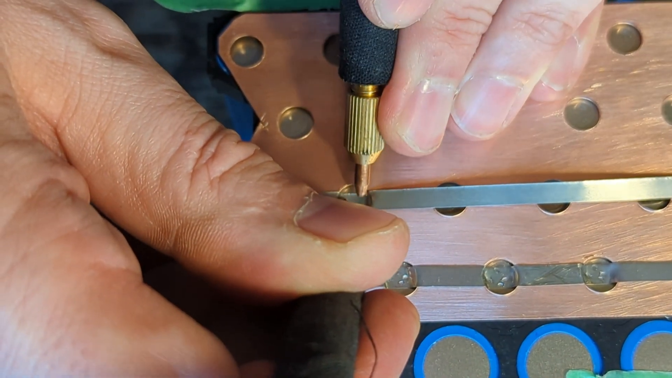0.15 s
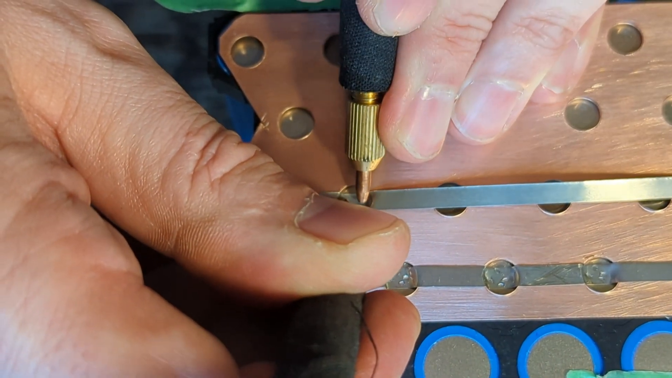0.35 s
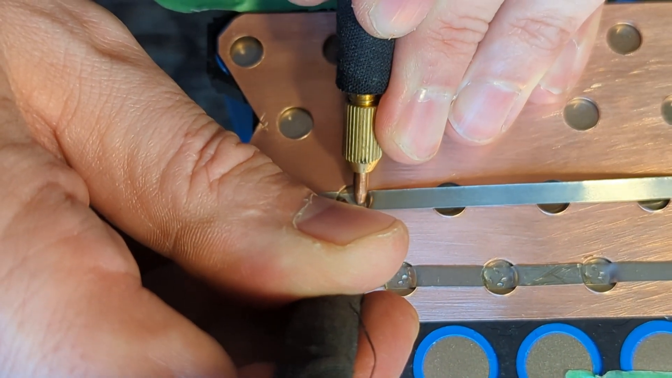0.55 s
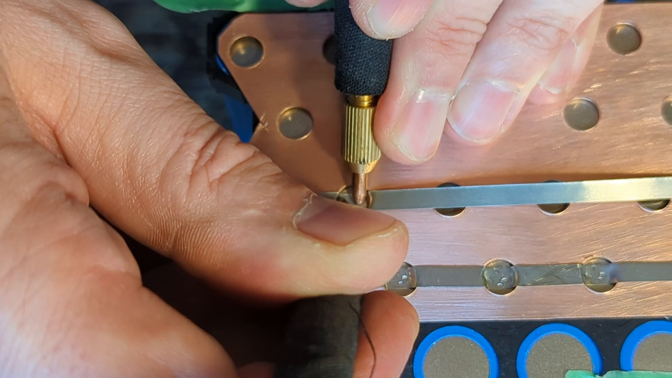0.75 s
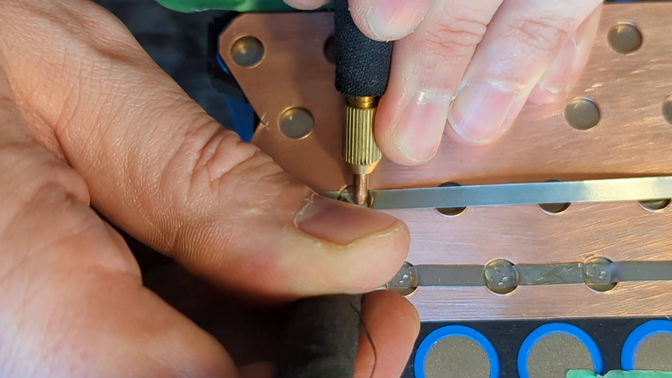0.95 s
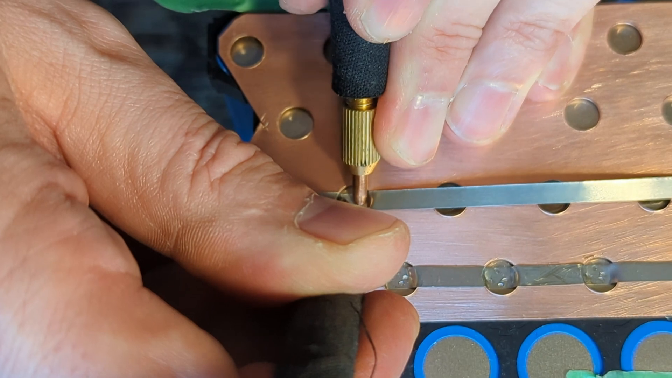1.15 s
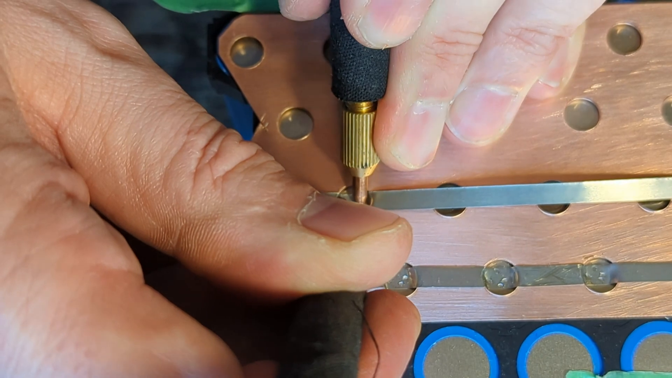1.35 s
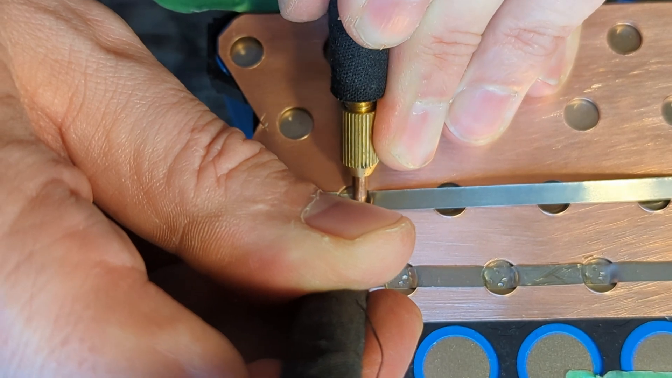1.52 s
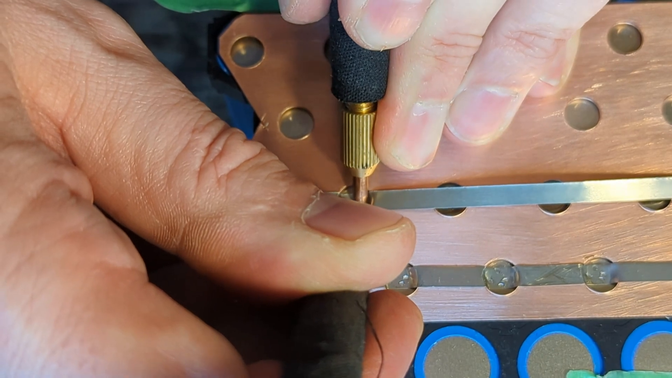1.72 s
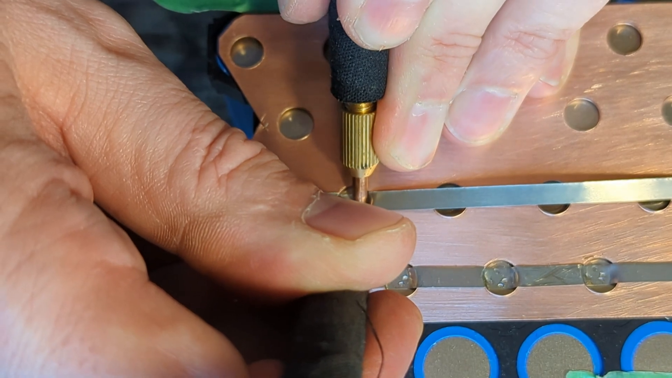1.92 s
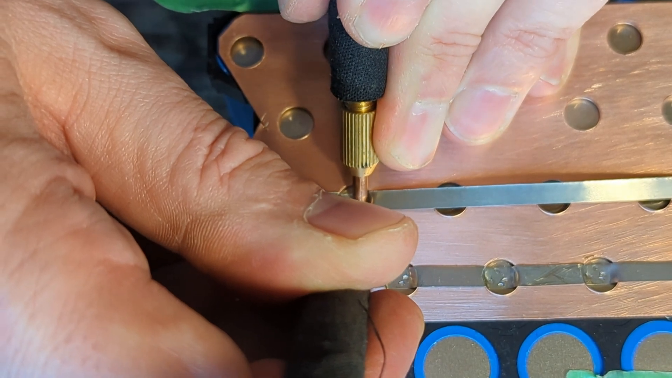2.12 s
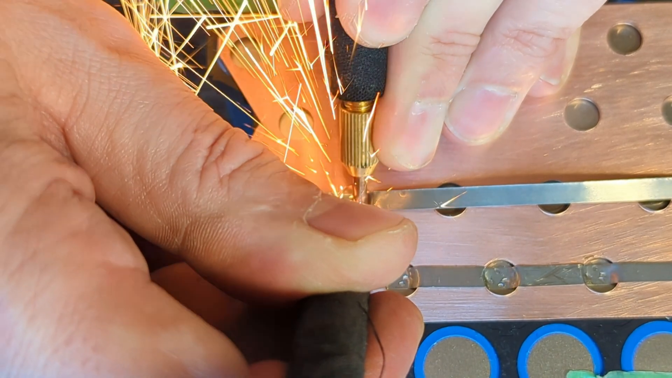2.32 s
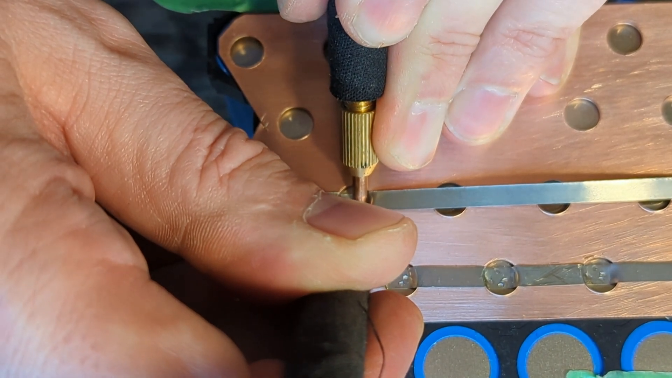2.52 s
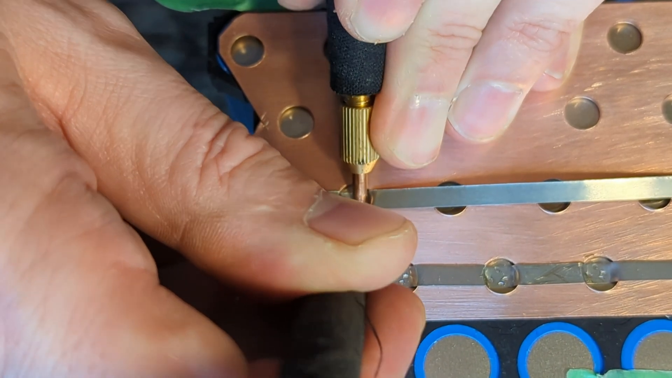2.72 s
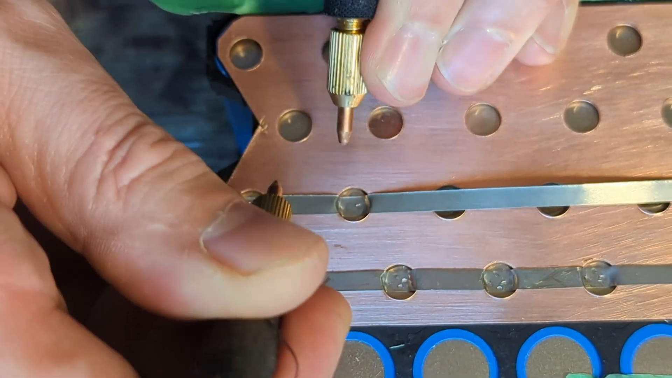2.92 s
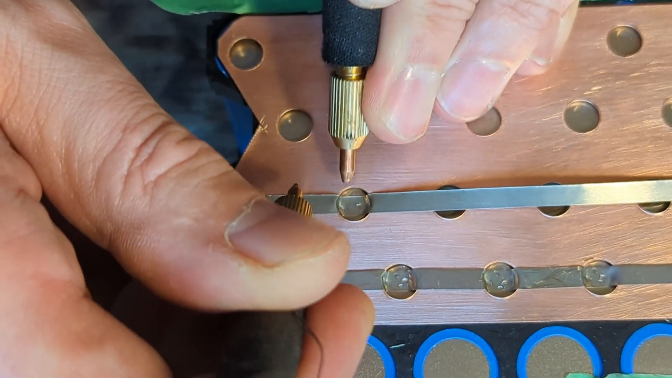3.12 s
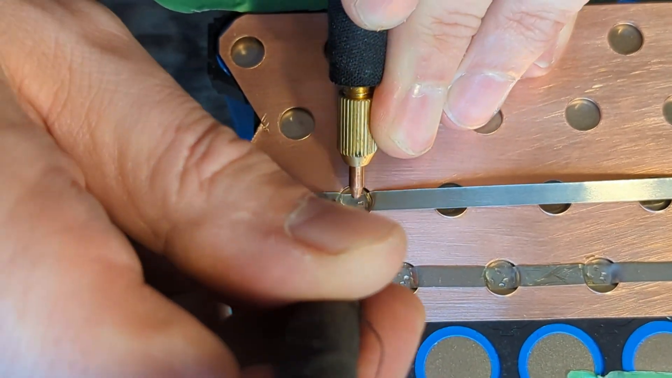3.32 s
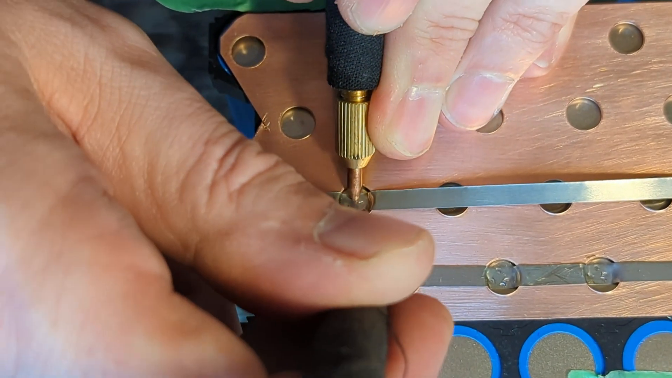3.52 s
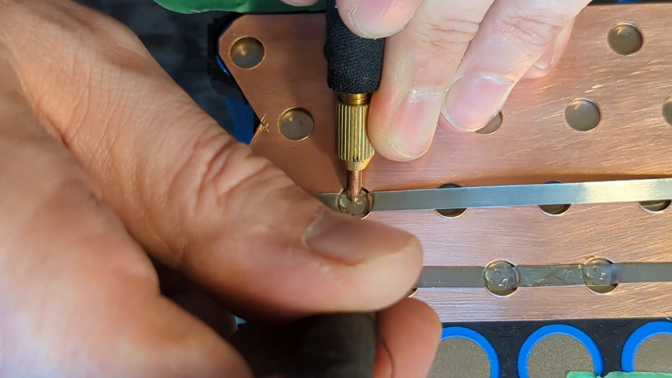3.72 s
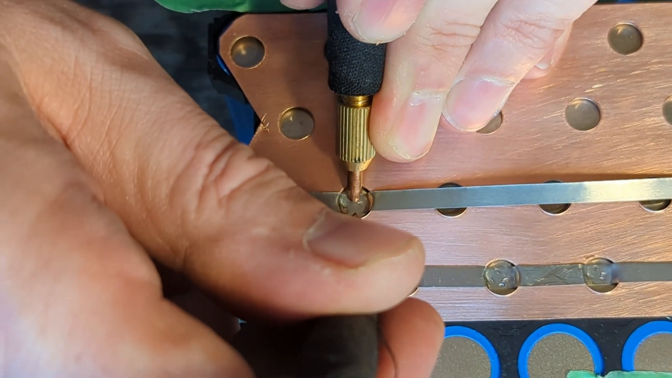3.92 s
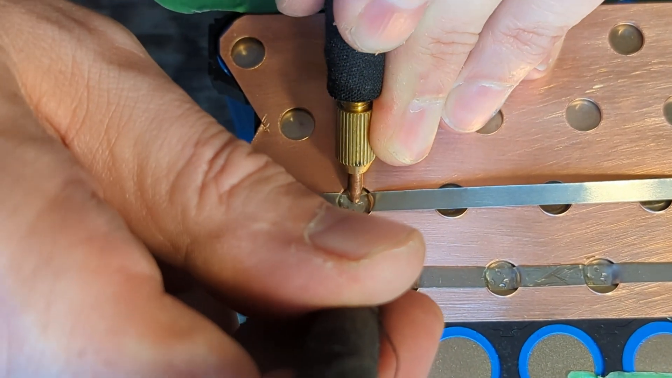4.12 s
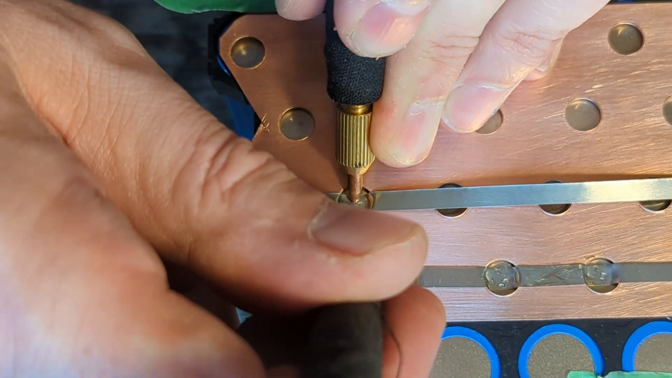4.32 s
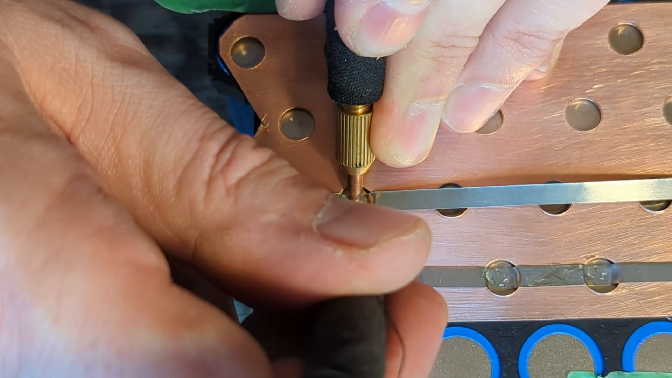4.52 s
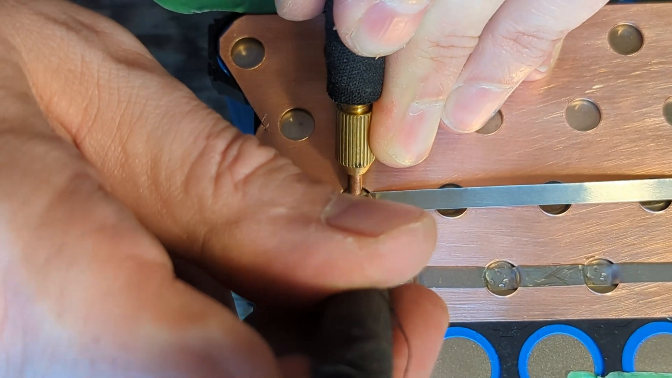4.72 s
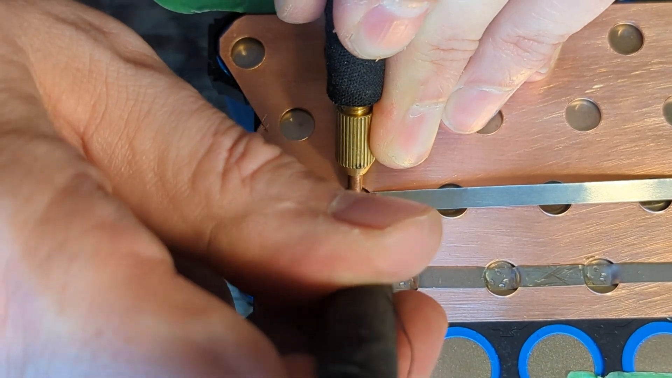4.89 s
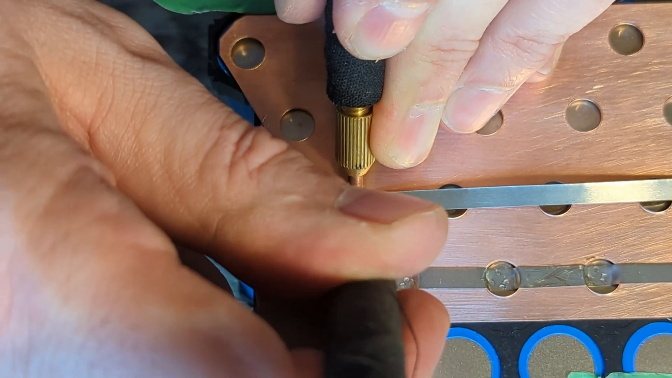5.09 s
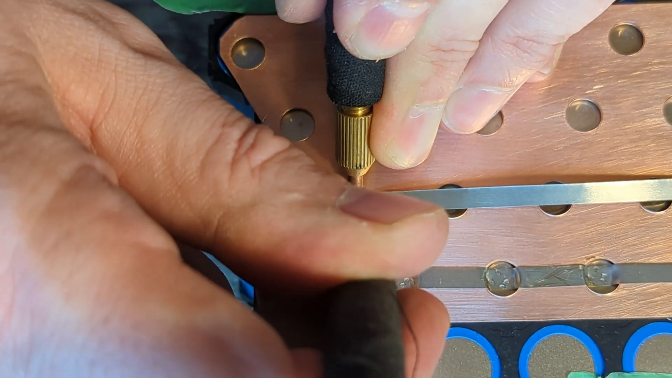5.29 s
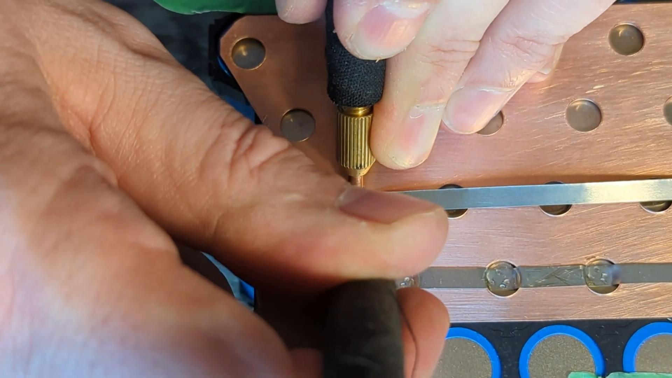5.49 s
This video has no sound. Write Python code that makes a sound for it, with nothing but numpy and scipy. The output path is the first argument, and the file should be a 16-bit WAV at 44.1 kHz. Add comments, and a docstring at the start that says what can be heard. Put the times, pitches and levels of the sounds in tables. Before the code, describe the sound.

A fan hums faintly in a small workshop. After a little over two seconds, a handheld spot welder fires once through a metal strip on a battery pack, a sharp snap with a spit of sparks and a brief ring of copper plate. Half a second later the probes come unstuck with light ticks and a dull, close thump. Cables rub softly, and a few faint ticks follow as the tips are set down again.

```python
"""A handheld spot welder fires once through a metal strip on a copper battery plate: a sharp snap.
The current pulse excites the resonances of strip and plate, and molten metal spits sparks.
The probes come unstuck with light ticks and a dull, close thump, the damped low modes of the pack,
as hands and cables shift with friction noise; then the tips are set on the next spot.
A fan hums behind it all, and the small workshop adds a short reverberation to the impacts."""
import sys
import numpy as np
from scipy import signal
from scipy.fft import rfft, irfft, next_fast_len
from scipy.io import wavfile
from scipy.ndimage import uniform_filter1d, map_coordinates

SR = 44100
rng = np.random.default_rng(int(sys.argv[2]) if len(sys.argv) > 2 else 0)


def persist_wave(psi):
    """Save psi, clipped to +-1, as 16-bit WAV."""
    counts = np.round(np.clip(psi, -1, 1) * 32767).astype(np.int16)
    wavfile.write(sys.argv[1], SR, np.atleast_2d(counts).T)


N = 244755
T = np.arange(N) / SR
RIGHT_LAG_S = .00011  # sound reaches the left microphone first
LEAD_S = .015  # time allowed for a burst to build up


def amp(db):
    """Amplitude ratio of a level in decibels."""
    return 10 ** (np.asarray(db) / 20)


def unit(x):
    """Normalisation to rms 1."""
    return x / np.sqrt(np.mean(x ** 2) + 1e-20)


def along(points, hz):
    """Interpolation of (f/Hz, value) points on a logarithmic frequency axis."""
    f, values = np.transpose(points)
    return np.interp(np.log(hz + 1), np.log(f + 1), values)


def peaks(resonances, hz):
    """Resonance: Lorentzian peaks in dB from rows of f/Hz, width/Hz, gain/dB."""
    return sum(db / (1 + (2 * (hz - centre) / width) ** 2) for centre, width, db in resonances)


def wobble(rate):
    """Slow random modulation: a spline through `rate` Gaussian values a second."""
    return map_coordinates(rng.standard_normal(int(N * rate / SR) + 4), [T * rate])


def fade(t, t60):
    """Exponential decay by 60 dB in t60."""
    return np.exp(-np.log(1000) * t / t60)


def stroke(start, length, attack, t60):
    """Envelope of a movement: Gaussian rise up to `start`, a plateau, then exponential decay."""
    return np.exp(-(np.minimum(T - start, 0) / attack) ** 2) * fade(np.maximum(T - start - length, 0), t60)


def softened(hz, contact_s):
    """An impact acts as a low-pass: the longer the contact, the weaker the high modes."""
    return 1 / (1 + (hz * contact_s) ** 4)


def add(track, start, sound):
    """Superposition of a sound on a track from `start` seconds on."""
    part = track[..., round(start * SR):][..., :sound.shape[-1]]
    part += sound[..., :part.shape[-1]]


def filtered(x, response):
    """Linear filtering: the spectrum is multiplied by a frequency response."""
    size = next_fast_len(N + SR // 2)
    return irfft(rfft(x, size) * response(np.fft.rfftfreq(size, 1 / SR)), size)[..., :N]


def causal(x, colour_db):
    """Minimum-phase filtering: a body rings only after it is struck."""
    size = x.shape[-1]
    cepstrum = irfft(np.log(amp(colour_db(np.fft.rfftfreq(size, 1 / SR)))))
    cepstrum[..., 1:size // 2] *= 2
    cepstrum[..., size // 2 + 1:] = 0
    return irfft(rfft(x) * np.exp(rfft(cepstrum)))


def burst(colour_db, t60, spread, swell=.001, size=8192):
    """Source and filter: a noise pulse, near rms 1 at LEAD_S, is coloured; spread is side over mid."""
    t = np.arange(size) / SR - LEAD_S
    envelope = fade(np.maximum(t, 0), t60) * fade(np.maximum(-t, 0), swell)
    noise = rng.standard_normal((2, size)) * envelope
    # flatten the excitation, so that the struck body sets the colour
    lumps_db = 10 * np.log10(np.abs(uniform_filter1d(np.abs(rfft(noise)) ** 2, size=24)))
    mid, side = causal(noise, lambda hz: colour_db(hz) - lumps_db)
    pair = np.array([mid + spread * side, np.roll(mid - spread * side, round(RIGHT_LAG_S * SR))])
    return unit(pair) * np.sqrt(np.mean(envelope ** 2))


# likeness of steady noise at the two microphones: f/Hz, correlation
CORRELATION = [(60, 1), (200, 0.81), (500, .35), (700, .15), (900, -.25), (1120, -0.047), (1400, -0.74),
               (2000, 0.35), (4000, 0.073), (9000, -0.034)]
def rush(colour_db):
    """Partial coherence: steady stereo noise of rms 1, delayed on the right."""
    angle = lambda hz: np.arccos(np.clip(along(CORRELATION, hz), -1, 1)) / 2
    response = lambda hz: amp(colour_db(hz)) * [np.cos(angle(hz)), np.sin(angle(hz))]
    mid, side = filtered(rng.standard_normal((2, N)), response)
    right = filtered(mid - side, lambda hz: np.exp(-2j * np.pi * hz * RIGHT_LAG_S))
    return unit(np.array([mid + side, right]))


def patchy(x, depth_db):
    """Turbulence: patches of noise swell and fade, each band on its own."""
    spectrogram = signal.stft(x, nperseg=1024)[2]
    field = uniform_filter1d(rng.standard_normal(spectrogram.shape[1:]), 4, axis=0)
    field = uniform_filter1d(field, 6, axis=1)
    return unit(signal.istft(spectrogram * amp(depth_db * unit(field)), nperseg=1024)[1][:, :N])


# reverberation time of the workshop: f/Hz, T60/s
REVERBERATION = [(100, .4), (700, 0.39), (2000, 0.24), (7000, 0.25), (15000, 0.23)]
def workshop(x, near_db, room_db, near_t60=.014, gap_s=.003):
    """Reverberation: early reflections off bench and hands and a diffuse tail follow the direct sound."""
    hz, t, noise = signal.stft(rng.standard_normal((2, SR // 2)), SR, nperseg=256)
    tail = signal.istft(noise * fade(t, along(REVERBERATION, hz)[:, None]), SR, nperseg=256)[1]
    near = rng.standard_normal(tail.shape) * fade(np.arange(tail.shape[1]) / SR, near_t60)
    response = amp(near_db) * near / np.linalg.norm(near[0])
    response += amp(room_db) * tail / np.linalg.norm(tail[0])
    out = x.copy()
    add(out, gap_s, signal.fftconvolve(x, response, axes=1))
    return out


def fan_whine(hz=709, wander_hz=9, full_db=-71.5, growth_db=11, grown_s=2.4, flutter_db=4):
    """Frequency and amplitude modulation: a faint, unsteady tone grows to its full level."""
    pitch_hz = hz + wander_hz * wobble(2)
    level_db = full_db - growth_db * np.maximum(1 - T / grown_s, 0) + flutter_db * wobble(6)
    phase = 2 * np.pi * np.cumsum(pitch_hz) / SR + .9 * wobble(30)
    return amp(level_db) * unit(np.sin(phase))


# spectra of the moving air and of the rumble: f/Hz, relative level/dB
AIR_SPECTRUM = [(20, -10.5), (130, 1.5), (440, 1.5), (570, -2), (950, -3.5), (1400, -3), (2250, -10.5),
                (3250, -14.5), (3420, -21), (4200, -23), (5000, -35.5), (6400, -34), (10000, -52.5),
                (16000, -63)]
RUMBLE_SPECTRUM = [(20, -41.5), (31, -23), (42, 1), (52, 14), (66, -0.5), (80, 8), (100, 1.5), (135, -6.5),
                   (250, -55)]
# resonances of the fan housing: f/Hz, width/Hz, gain/dB
HOUSING_RESONANCES = [(265.3, 37, 4), (660, 74, 7.5), (706, 67, 6.5), (1137.3, 31, 9.5), (1335, 52, 3.5),
                      (1902, 210, 4), (2645, 130, 3.5), (2905, 202.5, 3.5), (3790, 145, 2.5),
                      (8730, 450, 9.5)]
# hum lines of the motor: f/Hz, mean level/dB
MOTOR_LINES = [(51, -65), (77, -63), (155, -69), (199, -75.5)]
def fan(air_db=-55.5, rumble_db=-55.5, sink_s=3.08, sink_length_s=1.2, waver_db=1, drift_rad=.52):
    """Turbulent air excites the housing's resonances over rumble and motor hum; all sink a little, once."""
    sunk = np.clip((T - sink_s) / sink_length_s, 0, 1)
    air_sink_db, low_sink_db = 1.3 * sunk, 2.5 * sunk
    flow = rush(lambda hz: along(AIR_SPECTRUM, hz) + peaks(HOUSING_RESONANCES, hz))
    air = amp(air_db - air_sink_db + .3 * wobble(8.3)) * patchy(flow, depth_db=2.32)
    rumble = amp(rumble_db - low_sink_db) * rush(lambda hz: along(RUMBLE_SPECTRUM, hz))
    hum = np.zeros(N)
    for hz, db in MOTOR_LINES:
        level_db = db + waver_db * wobble(1.9) - (low_sink_db - low_sink_db.mean())
        hum += amp(level_db) * unit(np.sin(2 * np.pi * hz * T + drift_rad * wobble(5.05)))
    return air + rumble + hum


# spectrum of rubbing cables: f/Hz, relative level/dB
RUB_SPECTRUM = [(25, -36.5), (110, -5.5), (200, -8), (310, 0.5), (420, -22), (800, -50), (3000, -81.5)]
# movements of hands and cables: t/s, duration/s, level/dB
CABLE_SHIFTS = [(2.858, 0.079, -54), (3.208, .28, -58.5)]
def cable_rub(grain_db=3):
    """Sliding friction: the cables make a dull, uneven noise as the probes move on."""
    motion = sum(amp(db) * stroke(s, length, attack=.037, t60=.8) for s, length, db in CABLE_SHIFTS)
    return motion * unit(rush(lambda hz: along(RUB_SPECTRUM, hz)) * amp(grain_db * wobble(25.05)))


# spectrum of light contact on metal, by fingertip or probe: f/Hz, relative level/dB
CONTACT_SPECTRUM = [(500, -23), (3000, -14), (4400, -8.5), (5300, -9.5), (7000, -3), (9000, -8),
                    (11500, -12), (16000, -18.5)]
def fingertip(start_s=.132, level_db=-74, fast_hz=7800, slow_hz=6460, slowing_s=.029, width_hz=300):
    """Stick-slip friction: a fingertip squeaks over the plate, lower in pitch as it slows."""
    speed = np.exp(-np.maximum(T - start_s, 0) / slowing_s)
    centre_hz = slow_hz + (fast_hz - slow_hz) * speed
    band = unit(filtered(rng.standard_normal((2, N)), lambda hz: 1 / (1 + (hz / width_hz) ** 2) ** .63))
    squeak = unit(band * np.sin(2 * np.pi * np.cumsum(centre_hz) / SR))
    fizz = amp(-8) * rush(lambda hz: along(CONTACT_SPECTRUM, hz))
    push = amp(level_db) * stroke(start_s, length=.033, attack=.009, t60=.49)
    grip = amp(2.9 * wobble(150))  # the skin catches and slips
    return push * unit((squeak + fizz) * grip)


# resonances of the copper tips: f/Hz, width/Hz, gain/dB
TIP_RESONANCES = [(4360, 160, 11), (5800, 164, 1), (6960, 300, 1), (9000, 250, 8)]
# tips dragging off the strip: t/s, duration/s, level/dB
TIP_SCRAPES = [(2.750, .02, -66), (2.794, 0.052, -64.5)]
# tips touching the strip: t/s, level/dB (before tick_gain_db), ping f/Hz
TIP_TICKS = [(0.6194, -78, 6670), (0.6968, -67.5, 6900), (1.2311, -67.5, 8960), (1.4346, -61, 5820),
             (2.7147, -45, 8650), (2.766, -46.5, 9070), (2.795, -44, 5040), (3.4665, -60.5, 7270),
             (3.5533, -58, 6330), (4.4635, -69, 8650), (5.2016, -75, 11100)]
def probes(grit_db=3, tick_gain_db=-2.5, ping_width_hz=410, ping_db=10):
    """Friction and impact excite the tips' resonances: gritty scrapes, and ticks that each ping."""
    tip = lambda hz: along(CONTACT_SPECTRUM, hz) + peaks(TIP_RESONANCES, hz)
    grit = rng.standard_normal((2, N)) * amp(grit_db * wobble(600))
    drag = sum(amp(db) * stroke(s, length, attack=.0063, t60=.11) for s, length, db in TIP_SCRAPES)
    out = drag * unit(filtered(grit, lambda hz: amp(tip(hz))))
    for s, db, ping_hz in TIP_TICKS:
        colour = lambda hz: tip(hz) + peaks([(ping_hz, ping_width_hz, ping_db)], hz)
        add(out, s - LEAD_S, amp(db + tick_gain_db) * burst(colour, t60=.028, spread=.69, swell=.011))
    return workshop(out, near_db=-12, room_db=-15)


# modes of the battery pack on its bench: f/Hz, relative level/dB, T60/s, sideways over forward swing
PACK_MODES = [(111.7, -5, 0.073, 0.35), (160, -7, 0.047, 0.54), (225.5, -3, 0.055, -0.3),
              (255, -13, 0.036, 4.5), (286.5, 2, 0.026, 0.2), (466, 0, 0.027, 0.6), (550, -14, .028, -1)]
# spectrum of a hard contact: f/Hz, relative level/dB
CLACK_SPECTRUM = [(30, -37.5), (200, -14), (600, 3), (950, -8.5), (1450, -9.5), (1750, -10.5), (2020, -1.5),
                  (2500, -9), (3000, -16.5), (6000, -26.5), (12000, -67.5)]
# blows on the pack: t/s, excitation level/dB, contact time/s
PACK_BLOWS = [(2.326, -35, 0.0037), (2.7930, -16, 0.0013), (2.7966, -8, 0.00083), (2.8025, -3.5, 0.0041),
              (2.8098, -15.5, 0.0055), (2.913, -33, 0.0044), (2.941, -34.5, 0.0031), (3.006, -40.5, 0.0053)]
def pack_knocks(rise_s=.0013, hard_contact_s=.00081, hard_clack_db=-21, loss_per_doubling_db=12.5):
    """Impact excitation: blows swing the pack's low modes; the shorter the contact, the more it clacks."""
    thuds, clacks = np.zeros((2, N)), np.zeros((2, N))
    t = np.arange(SR // 3) / SR
    onset = 1 - np.exp(-(t / rise_s) ** 2)
    for s, blow_db, contact_s in PACK_BLOWS:
        for hz, db, t60, sideways in PACK_MODES:
            phase = 2 * np.pi * hz * t
            swing = np.sin(phase) + sideways * np.array([[1], [-1]]) * np.cos(phase)
            add(thuds, s, amp(blow_db + db) * softened(hz, contact_s) * swing * fade(t, t60) * onset)
        clack_db = blow_db + hard_clack_db - loss_per_doubling_db * np.log2(contact_s / hard_contact_s)
        clack = burst(lambda hz: along(CLACK_SPECTRUM, hz), t60=.036, spread=.68)
        add(clacks, s - LEAD_S, amp(clack_db) * clack)
    thuds = signal.sosfilt(signal.butter(4, [68, 570], "band", fs=SR, output="sos"), thuds)
    return workshop(thuds, near_db=-36, room_db=-30.5) + workshop(clacks, near_db=-11.5, room_db=-14)


# modes of the copper plate: f/Hz, relative level/dB, T60/s
PLATE_MODES = [(150, -17, .2), (196, -15, .2), (275, -18, .15), (525, -12, .09), (708, -5, .12),
               (765, -3, .06), (891, 2, .06), (1170, -2, .06), (1490, 9, .03), (1970, -10, .08),
               (3220, -13, .03), (8446, -18, .045)]
# jolts to the plate: t/s, excitation level/dB, contact time/s
PLATE_JOLTS = [(2.3245, -25.5, .0001), (2.754, -36, 0.0014)]
def plate_ring(right_lag_rad=.47, rise_s=.0006):
    """Damped free vibration: the plate rings when the current jolts it, softly as a probe comes loose."""
    ring, t = np.zeros((2, N)), np.arange(SR // 3) / SR
    for s, jolt_db, contact_s in PLATE_JOLTS:
        for hz, db, t60 in PLATE_MODES:
            phase = rng.uniform(0, 2 * np.pi) + np.array([[0], [-right_lag_rad]])
            envelope = fade(t, t60) * (1 - np.exp(-t / (rise_s + contact_s)))
            mode = np.sin(2 * np.pi * hz * t + phase) * envelope
            add(ring, s, amp(jolt_db + db) * softened(hz, contact_s) * mode)
    return ring


# spectrum of a spark: f/Hz, relative level/dB
CRACK_SPECTRUM = [(30, -14), (70, -3.5), (250, -12.5), (560, -8), (760, 1.5), (1050, -10.5), (1500, -6),
                  (2500, -7.5), (3400, -6), (4700, -19.5), (6200, -14.5), (8800, -15), (11500, -25),
                  (16000, -30.5)]
# resonances of the strip under the tips: f/Hz, width/Hz, gain/dB
STRIP_RESONANCES = [(715, 80, 5), (885, 80, 9), (1165, 100, 11), (1490, 170, 4), (2000, 160, 4),
                    (3300, 400, 3), (8300, 500, 3)]
def crack(swell, t60, treble_db):
    """Broadband excitation: a noise pulse at the weld is filtered by the strip's resonances."""
    shelf = [(3000, 0), (11000, treble_db)]
    colour = lambda hz: along(CRACK_SPECTRUM, hz) + peaks(STRIP_RESONANCES, hz) + along(shelf, hz)
    return burst(colour, t60, spread=.48, swell=swell)


# sparks spitting from the weld: t/s, level/dB
WELD_SPARKS = [(2.3252, -14), (2.3310, -23.5), (2.3945, -47)]
def weld(peak_s=2.3238, snap_db=-18.5, sizzle_db=-30.5):
    """Joule heating: the current snaps, the cooling metal sizzles, and molten metal spits sparks."""
    out = np.zeros((2, N))
    add(out, peak_s - LEAD_S, amp(snap_db) * crack(swell=.01, t60=.036, treble_db=-.5))
    add(out, peak_s - LEAD_S, amp(sizzle_db) * crack(swell=.02, t60=.05, treble_db=-2))
    biggest_db = max(db for s, db in WELD_SPARKS)
    for s, db in WELD_SPARKS:
        treble_db = 8.5 + 1.1 * (biggest_db - db)  # smaller sparks are brighter
        add(out, s - LEAD_S, amp(db) * crack(swell=.0018, t60=.0058, treble_db=treble_db))
    return workshop(out, near_db=-7, room_db=-10)


def scene():
    """Linear superposition of all sources, left and right."""
    welder = weld() + plate_ring() + probes()
    handling = pack_knocks() + fingertip() + cable_rub()
    return welder + handling + fan() + fan_whine()


def record(dry):
    """Band limiting: a steep low-pass removes the highest treble."""
    cutoff_hz = 15600
    return signal.sosfilt(signal.cheby1(14, .1, cutoff_hz, fs=SR, output="sos"), dry)


dry = scene()
out = record(dry)
persist_wave(out)
```